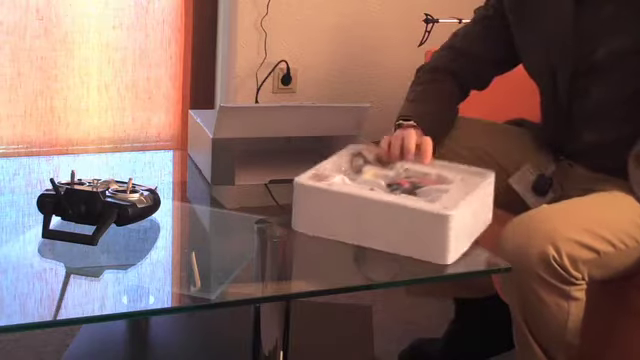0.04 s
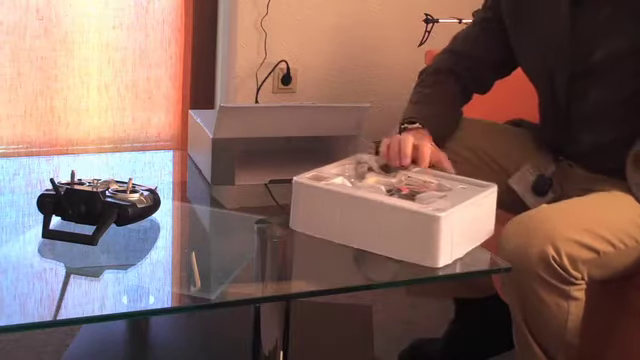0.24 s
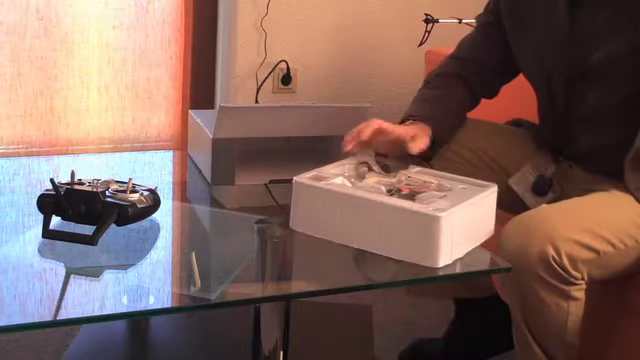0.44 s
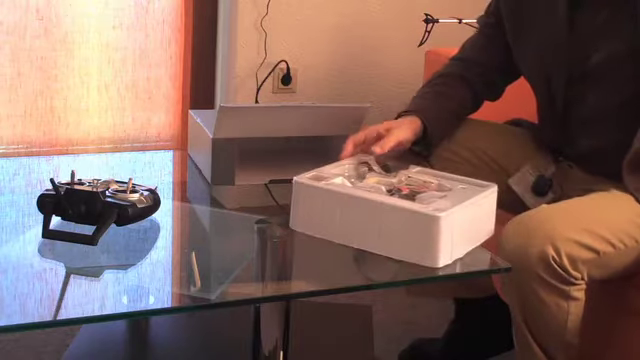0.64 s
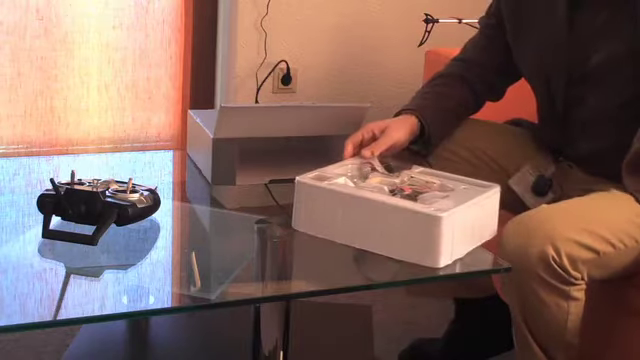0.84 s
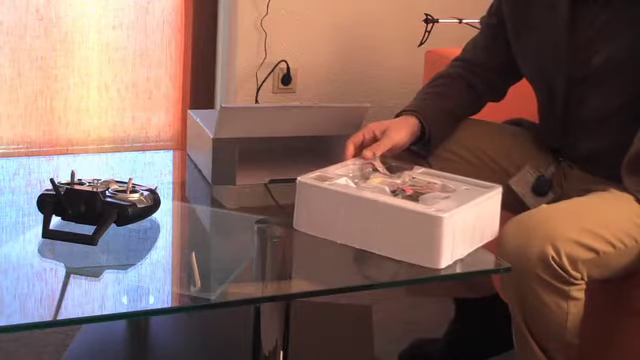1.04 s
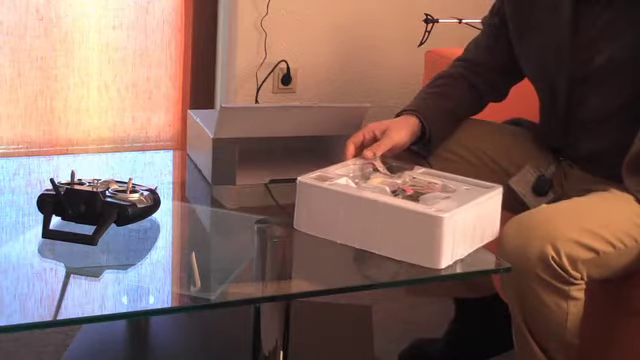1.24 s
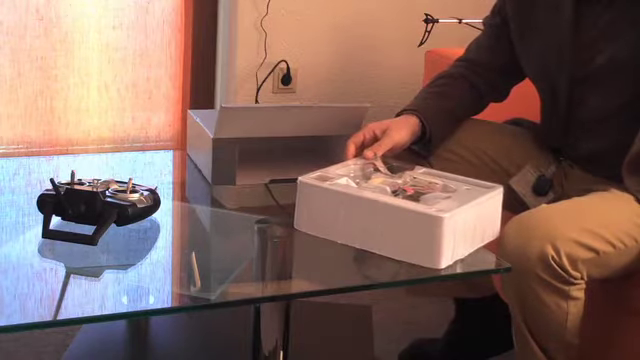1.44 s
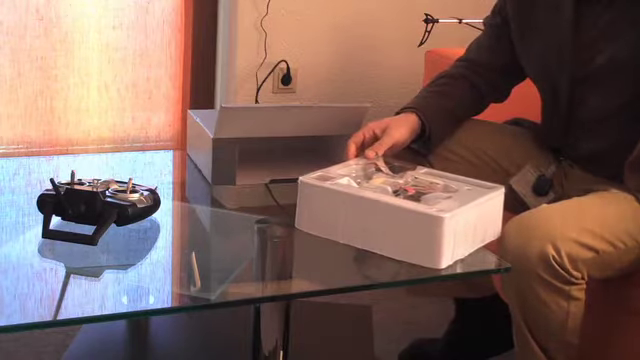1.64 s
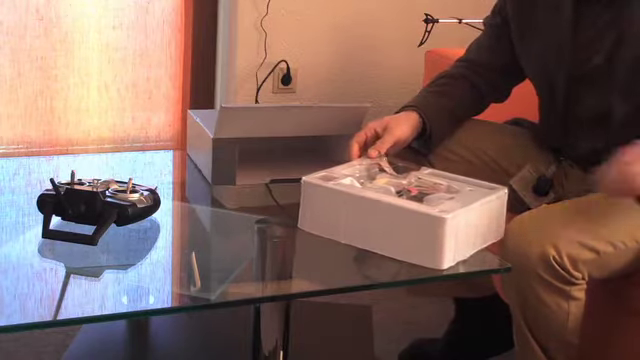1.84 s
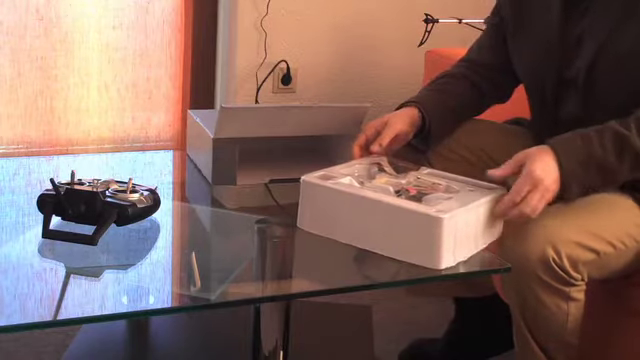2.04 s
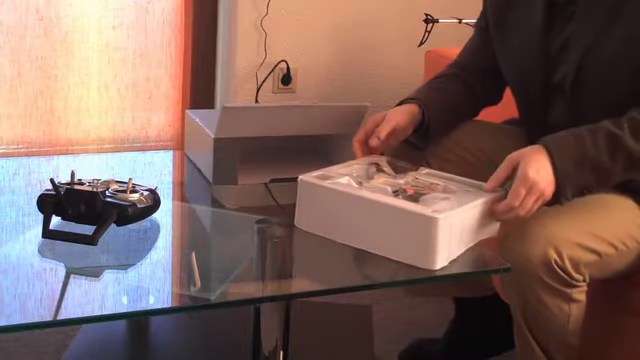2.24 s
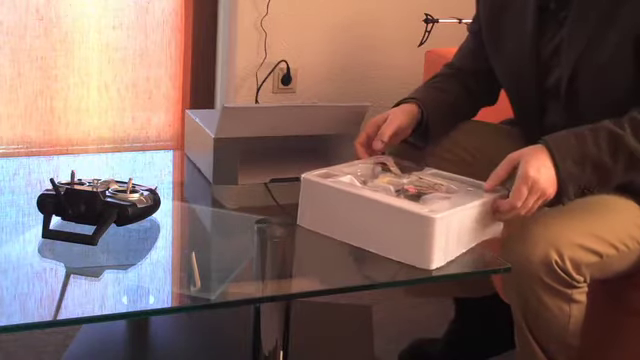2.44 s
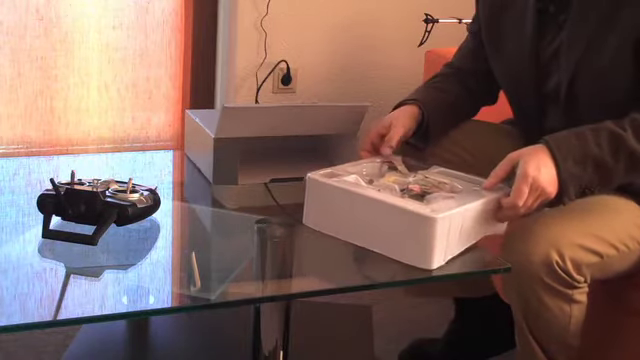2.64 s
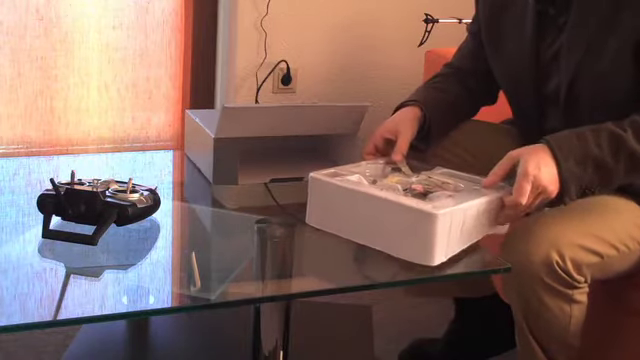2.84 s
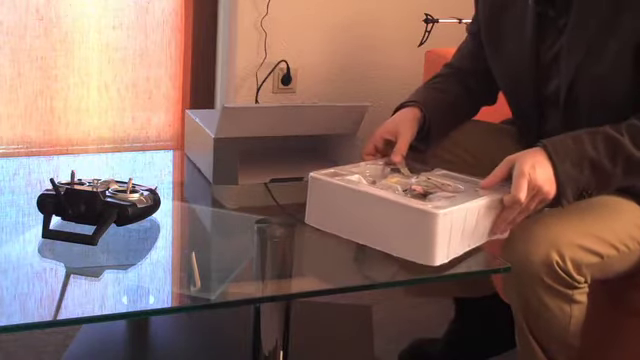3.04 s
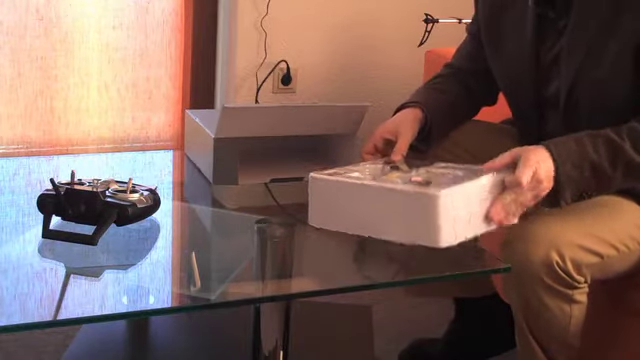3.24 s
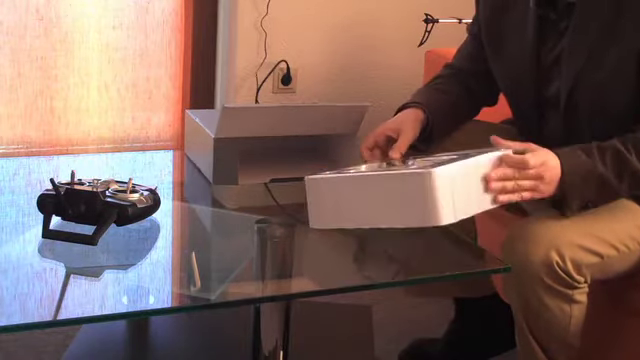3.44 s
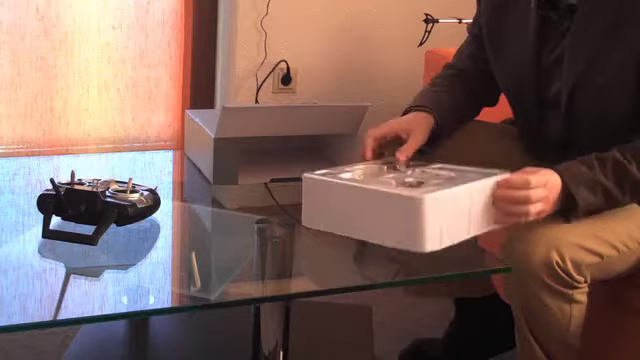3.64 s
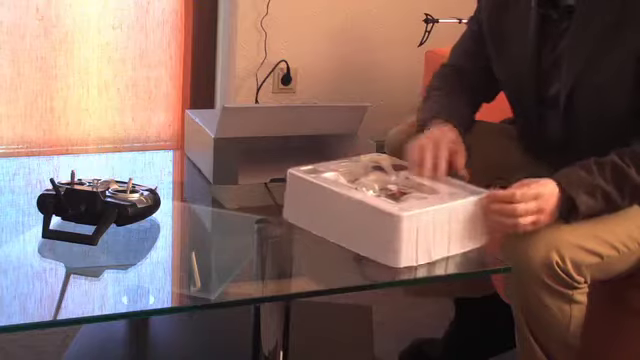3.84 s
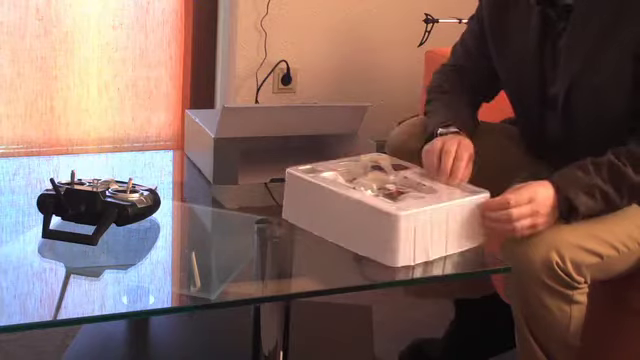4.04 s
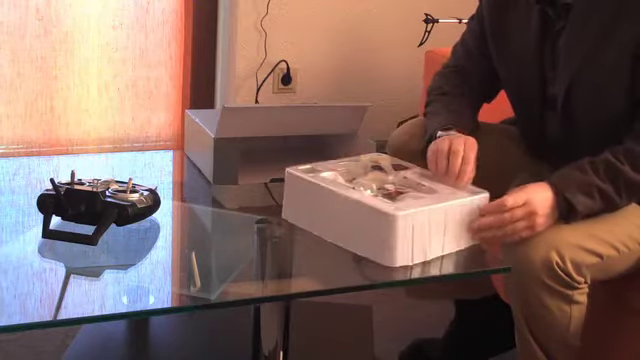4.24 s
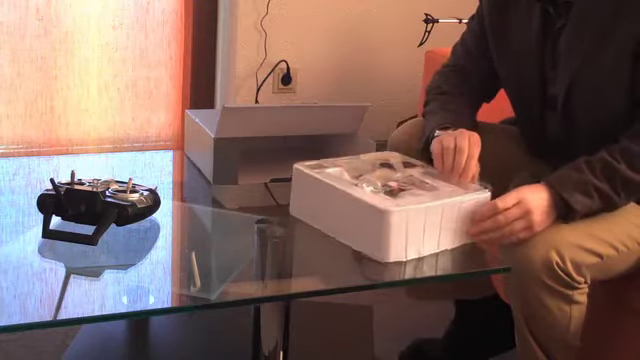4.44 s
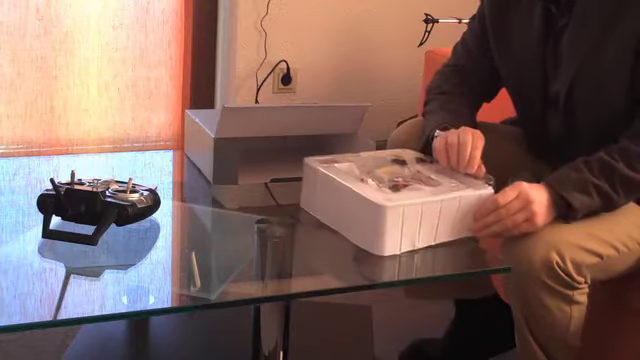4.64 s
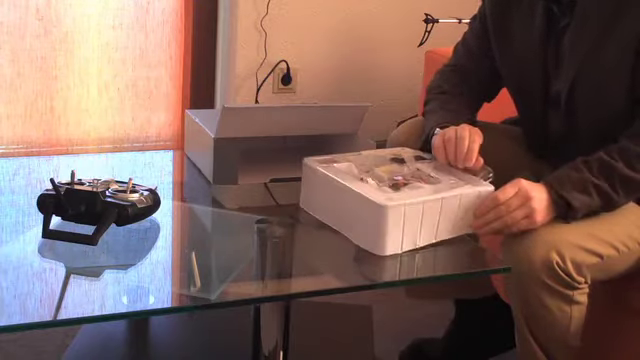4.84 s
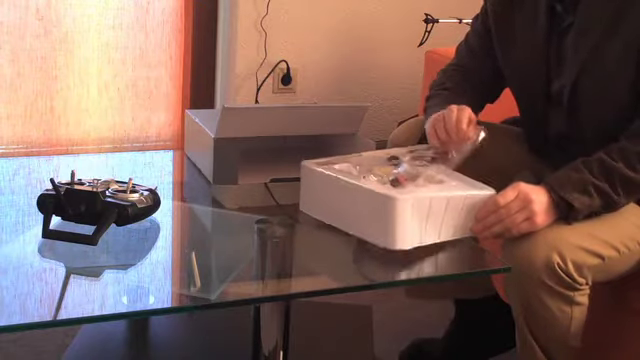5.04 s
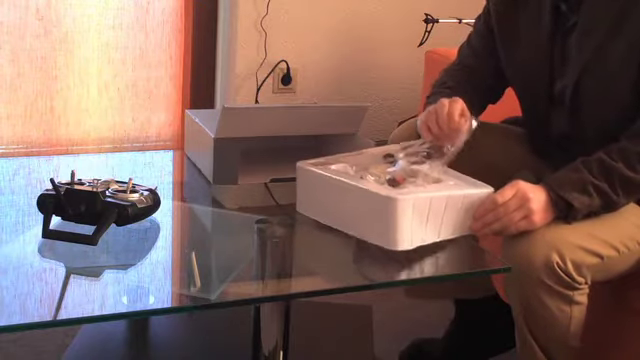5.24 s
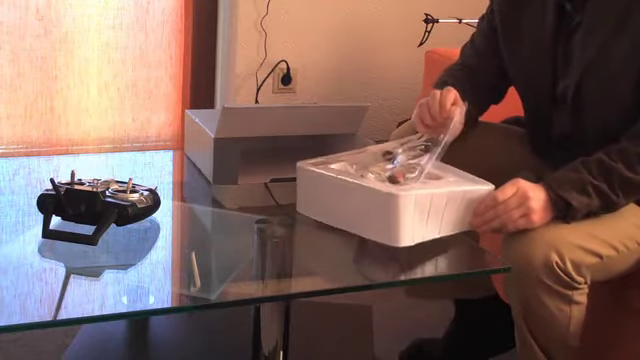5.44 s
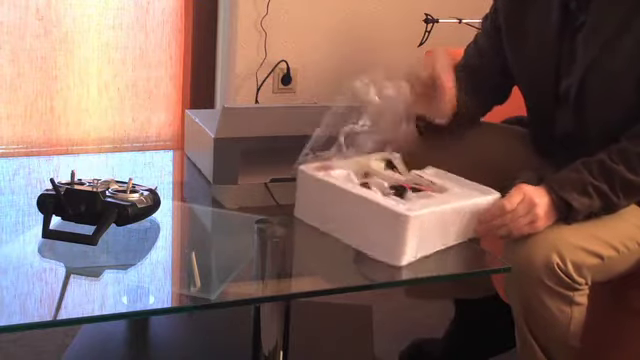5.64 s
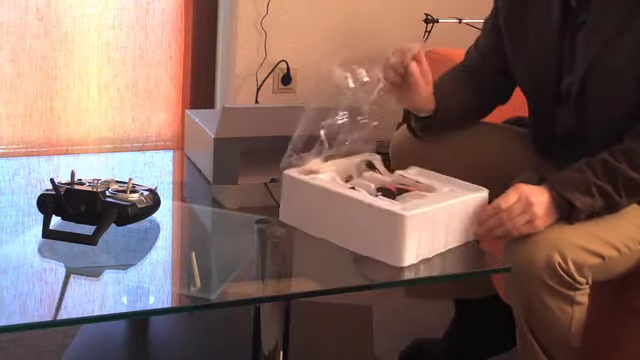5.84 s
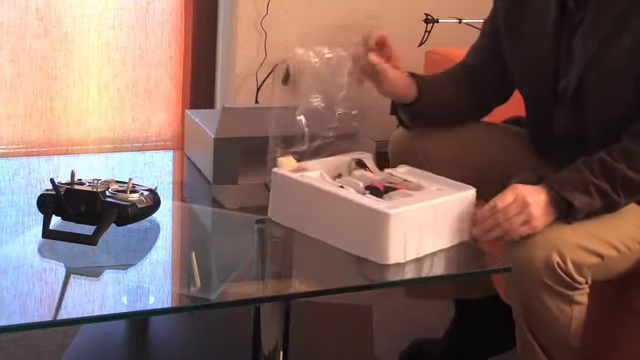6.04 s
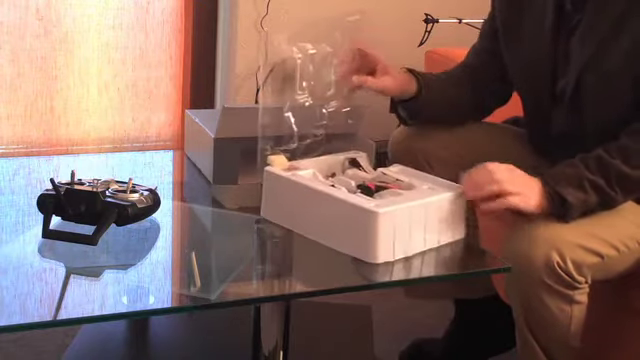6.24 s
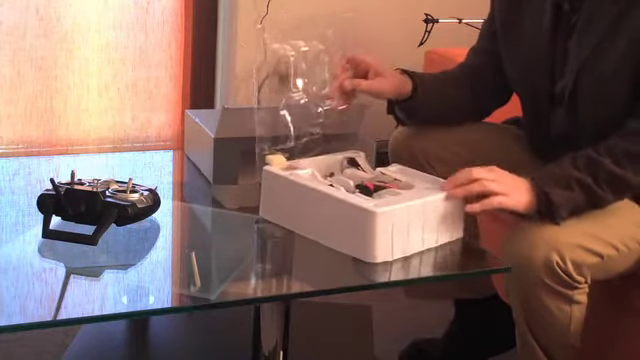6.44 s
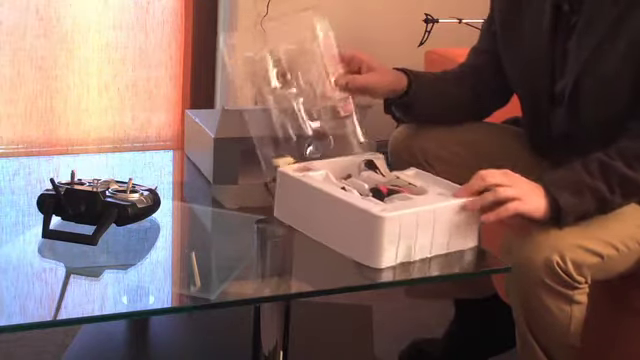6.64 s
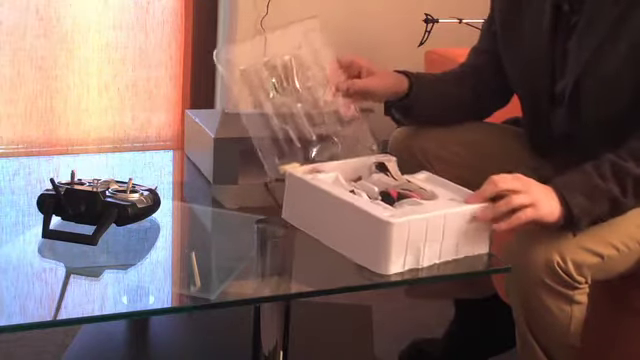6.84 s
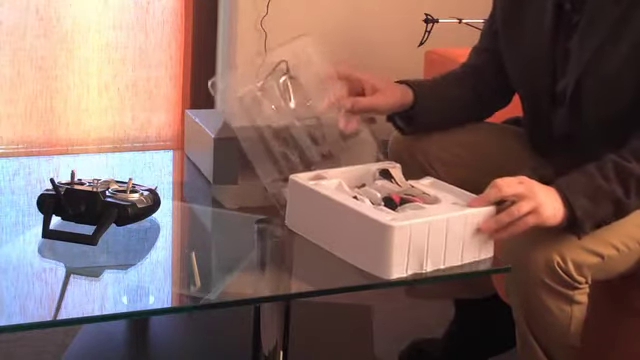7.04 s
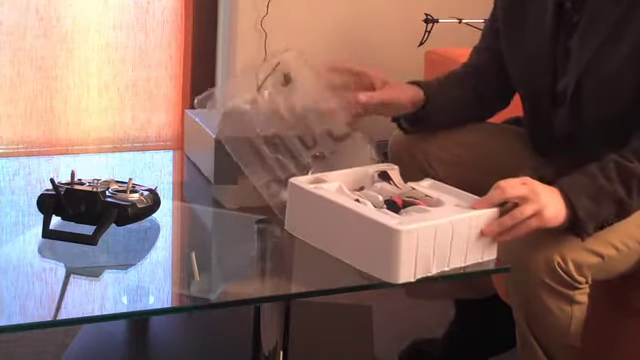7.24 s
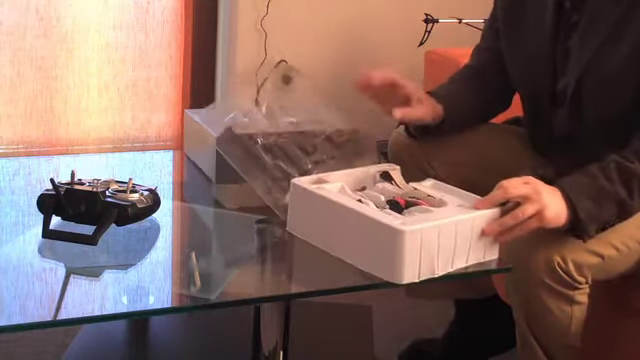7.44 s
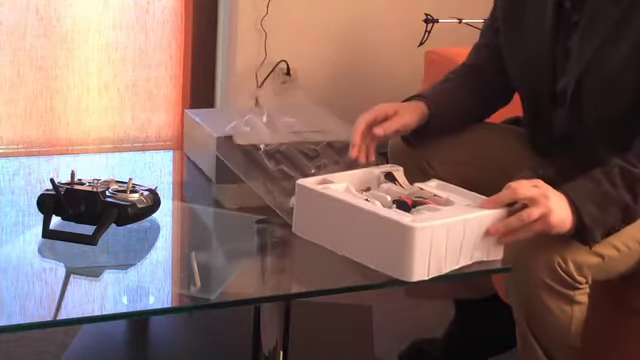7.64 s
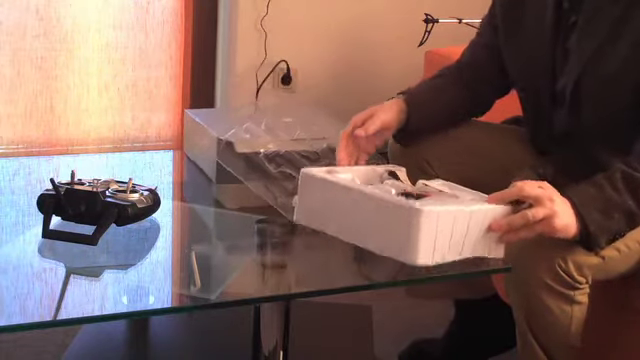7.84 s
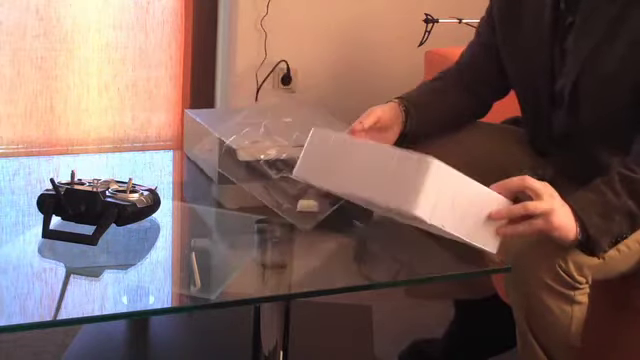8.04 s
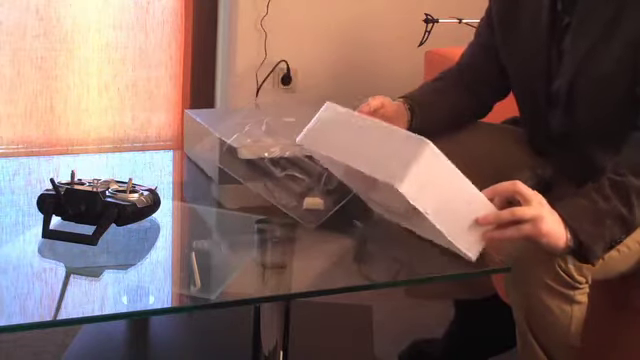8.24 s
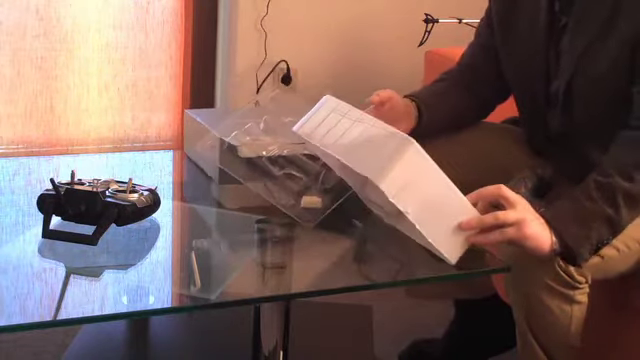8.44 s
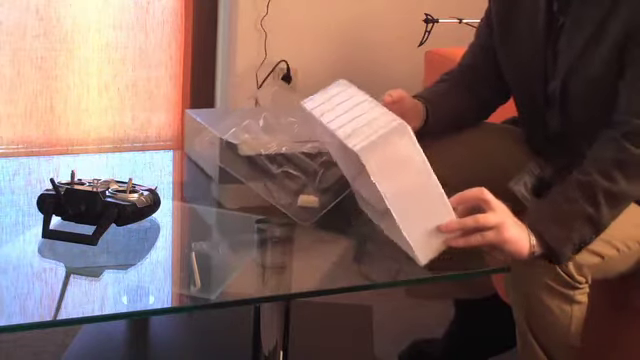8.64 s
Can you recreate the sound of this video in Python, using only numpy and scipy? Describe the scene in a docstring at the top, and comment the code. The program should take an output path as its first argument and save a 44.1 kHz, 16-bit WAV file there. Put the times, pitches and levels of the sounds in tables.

```python
"""A foam tray with a stiff plastic lid is set on a glass table, turned and unpacked in a small furnished room.
Knocks and lid pops are evened noise bursts, sent through broad colour ranges and the tray resonances.
Handling rustles as dense random creases over sliding hiss; single creases snap as short sines with clicks.
A short decaying noise tail answers each; behind lie faint background noise of room and recorder,
as coloured noise with hums, and the recorder's slipping baseline."""
import sys
import numpy as np
from scipy import signal
from scipy.fft import rfft, irfft
from scipy.io import wavfile
from scipy.ndimage import uniform_filter1d

SR = 44100
rng = np.random.default_rng(int(sys.argv[2]) if len(sys.argv) > 2 else 0)


def inscribe(sig):
    """Save sig as 16-bit PCM at rate SR to the path in sys.argv[1].

    A 1-D sig is mono; a 2-D sig holds one channel per row.
    Samples are clipped to [-1, 1] before scaling.
    """
    pcm = np.round(np.clip(np.atleast_2d(sig).T, -1, 1) * 32767)
    wavfile.write(sys.argv[1], SR, pcm.astype(np.int16))


N = 383669

# Tray knocks and lid pops, levels before common gains:
# (time [s], mid level [dB], body re mid [dB], treble re mid [dB], rattle T60 [s])
KNOCKS = [(0.077, -16.5, -4.5, -8.5, 0.031), (1.994, -48, 6.5, -7, 0.043), (2.062, -46.5, 1.5, 2, 0.048),
          (2.414, -43.5, -1, -8, 0.028), (2.872, -52.5, -18, -7, 0.055), (3.378, -39.5, -10, -10, 0.045),
          (3.664, -49.5, -5, -3.5, 0.061), (3.764, -27, 0.5, -14.5, 0.015), (3.776, -37, 4, -18, 0.045),
          (4.18, -46.5, -17, -6, .04), (4.912, -9, -18.5, -5, 0.044), (5.428, -43.5, 0.5, -12, 0.06),
          (5.544, -19, -4.5, 4.5, 0.057), (5.564, -10, -11.5, -8.5, 0.065),
          (5.579, -20.5, 11.5, -23, 0.027), (5.615, -21.5, -32, -3.5, 0.074), (5.943, -43, -22, -3, 0.032),
          (6.398, -45, -11, -2, 0.022), (6.545, -35, -26, -3, 0.035), (6.898, -30, -4, -5, 0.053),
          (6.941, -23.5, -13, 1, 0.023), (6.961, -27.5, -21.5, -19, 0.047), (7.167, -38.5, -24, -8, 0.046),
          (7.258, -35.5, -11.5, 4.5, 0.034), (7.341, -33.5, -28, 4, 0.032), (7.366, -26, -33, -11, 0.047),
          (7.461, -38, -24, 3, 0.03), (7.892, -36.5, -18, 5, 0.059), (7.984, -33, -28, 2.5, 0.028),
          (8.115, -39.5, -26, 1, 0.036), (8.224, -39, -24, -3, 0.059)]
# Rubs and squeezes, levels before common gains; swell and fade span 20 dB:
# (peak time [s], mid level [dB], swell [s], fade [s], body re mid [dB], treble re mid [dB])
RUBS = [(0.0, -54.5, .01, 0.1, 0, 13), (0.081, -33, 0.0099, 0.097, 4, -2),
        (0.215, -48.5, 0.089, .15, -23, 3), (0.3, -55.5, 0.056, 0.13, -16, 13),
        (0.48, -58, 0.2, 0.3, -18, 11), (0.59, -60, 0.14, .17, -16, 6.5), (0.72, -64, .15, 0.18, -16, 12.5),
        (0.83, -61.5, 0.18, 0.16, -16, 12.5), (0.906, -57, 0.033, 0.079, 1, -3),
        (1.006, -51.5, 0.08, 0.11, -18, 8), (1.15, -58, 0.14, .16, -19, 9), (1.33, -66, .1, 0.11, -16, 3),
        (1.72, -61, 0.31, 0.24, 3, -4), (2.1, -55.5, 0.52, .5, -4, -6), (2.43, -54, 0.13, 0.063, 2, -4),
        (2.5, -61.5, .1, 1, -1, -7), (2.88, -65, 0.038, 0.13, 9.5, -10), (3.1, -68.5, 0.069, 0.11, -6, 6),
        (3.24, -61, 0.33, .2, 4, -2), (3.379, -49.5, 0.035, .1, 3.5, -5.5), (3.5, -61, .2, 1.1, -10, -3.5),
        (3.769, -44, 0.09, 0.19, 0.5, -3.5), (4.198, -43, .022, .14, -4.5, -4),
        (4.36, -63, 0.51, 0.67, 4, 1), (4.49, -46.5, 0.08, 0.079, -4, 0), (4.75, -61.5, 0.93, .3, -3, -20),
        (5.1, -47.5, 0.054, 0.22, -5.5, -12), (5.46, -63, 0.26, .3, 5.5, -17),
        (5.7, -40, 0.15, 0.38, -3, -6.5), (5.95, -54, .015, .2, -11, -2), (6.12, -61.5, 0.12, .15, 10, -12),
        (6.408, -49.5, 0.038, 0.1, 2, -8), (6.492, -43.5, 0.031, 0.048, -2.5, 0),
        (6.552, -46.5, 0.033, 0.19, -15, -5.5), (6.882, -55.5, 0.13, 0.059, 3, -4),
        (7.0, -48.5, .03, 0.28, -5, -7), (7.174, -37.5, .018, 0.31, -7.5, -7.5),
        (7.386, -38.5, 0.041, 0.085, 4.5, -6.5), (7.6, -53.5, 0.096, 0.47, -6, 3),
        (7.775, -41.5, .33, .05, -11, -3), (7.845, -42, 0.061, 0.17, -19, 7),
        (7.915, -32, 0.13, 0.14, -19, -5.5), (8.01, -38, .08, 0.2, -20, -4),
        (8.125, -42, .02, 0.39, -16, -9.5), (8.25, -43, 0.087, 0.14, -4, -7),
        (8.46, -39, 0.044, 0.18, -15, -8.5), (8.55, -42.5, 0.17, 0.1, -3, -19)]
# Single plastic creases, peaks before common gain and colouring: (time [s], peak level [dB], pitch [Hz])
TICKS = [(0.1561, -32.5, 5150), (0.2123, -33.5, 5430), (0.278, -35.5, 3130), (0.2868, -26, 4100),
         (0.3998, -40, 4540), (0.427, -33, 5000), (0.4361, -31, 5500), (0.4717, -30.5, 4500),
         (0.5509, -30.5, 4000), (0.6019, -36.5, 4400), (0.7639, -29.5, 3930), (0.8162, -31, 4400),
         (0.8342, -37, 6300), (0.9329, -38, 3910), (0.9528, -33, 5060), (0.9638, -42, 3380),
         (0.9714, -31.5, 4830), (1.0026, -30.5, 3600), (1.089, -32.5, 4540), (1.1292, -46, 4870),
         (1.1359, -28, 4600), (1.1446, -33, 4660), (1.1599, -29.2, 5700), (1.3244, -52, 3100),
         (1.3331, -46, 5850), (2.5494, -42, 3830), (3.9304, -42.5, 5420), (4.1801, -46, 3500),
         (4.7038, -44, 4430), (4.8871, -52.3, 5520), (5.251, -48, 2550), (5.7865, -35.5, 3430),
         (6.1162, -53, 3040), (6.4876, -22, 4500), (6.4964, -32, 4500), (6.5961, -40, 5500),
         (7.2285, -29.5, 3830), (8.0221, -29, 5670), (8.1164, -31, 5600), (8.2385, -34, 4860),
         (8.4613, -39, 2570), (8.4953, -42, 4560)]
# Tray resonances: (centre [Hz], width [Hz], level [dB])
TRAY_MODES = [(434, 26, -2.5), (686, 48, -9.5), (930, 18, -20.5), (1060, 35, -17), (1402, 27, -4),
              (1996, 33, -11)]
# Foam boom, relative spectrum: (frequency [Hz], gain [dB])
BODY = [(150, -24), (300, -7.5), (430, -2), (560, -1.5), (750, -3), (1400, -58.5)]
# Wall clack, relative spectrum: (frequency [Hz], gain [dB])
MID = [(400, -10), (700, -1), (1000, -0.5), (1500, 0), (2200, -1.5), (3200, -8.5), (6000, -47)]
# Plastic crackle, relative spectrum: (frequency [Hz], gain [dB])
TREBLE = [(1500, -7), (2600, 6), (3800, 4.5), (5200, 0.5), (7000, -18.5), (9000, -52)]
# Plastic fizz, relative spectrum: (frequency [Hz], gain [dB])
AIR = [(3500, -14.5), (5200, -1.5), (6300, -4), (7500, -12), (8400, -25), (9000, -70), (9500, -47.5)]
# Crease snaps, relative spectrum: (frequency [Hz], gain [dB])
TICK_COLOUR = [(700, -21.0), (2000, 7), (5000, 2.5), (7500, 2.5), (8600, -13), (9300, -56.0)]
# Room decay by octave: (centre [Hz], T60 [s])
ROOM_T60 = [(250, 0.45), (500, 0.37), (1000, 0.38), (2000, 0.31), (4000, 0.29), (8000, 0.23)]
# Capsule bass loss, relative response: (frequency [Hz], gain [dB])
MIC = [(30, -49.5), (120, -14.5), (250, -11.5), (320, -5), (400, 1.5)]
# Background noise of room and recorder, relative spectrum: (frequency [Hz], density [dB per Hz])
HUSH = [(15, -50), (25, -8.5), (170, -1), (300, -5), (383, -14), (906, -0.5), (1000, -2), (1190, -5),
        (1720, -2.5), (1850, -8), (3100, -11.5), (3680, -11.5), (7150, -21.5), (8920, -63), (11600, -91),
        (19600, -120)]
# Hums in the background noise: (centre [Hz], width [Hz], level re background noise [dB])
HUM_MODES = [(423, 34, -10.5), (1234, 23, -7), (1542, 23, -8.5), (1843, 39, -10)]
# Recorder baseline slips, before the top cut:
# (start [s], offset [full scale], slip time [s], creep-back time constant [s])
SLIPS = [(0, -.0008, .001, 0.074), (.284, .0017, 0.0044, 0.099), (.77, -.0016, .015, 0.081),
         (4.909, -0.006, .003, .003), (4.913, 0.0032, 0.0069, 0.091), (5.27, -.003, 0.075, 0.11),
         (5.545, 0.11, 0.0011, .0012), (5.545, -0.047, 0.0026, .004), (5.548, 0.019, .014, 0.09),
         (5.96, -0.0055, .5, 0.018), (6.83, -.0014, .03, 0.069)]

# air re mid = offset + slope * (treble re mid)
KNOCK_AIR_DB, KNOCK_AIR_SLOPE = -8.5, 1.41
RUB_AIR_DB, RUB_AIR_SLOPE = -5.5, 1.24
RUB_DULLING = 0.21  # share by which treble and air fade faster
CRACKLE_PER_S, CRACKLE_SHARE = 90, 0.58  # rarer creases, bright ranges only
HUSH_DB = -64.5
BASELINE_REST = -0.00043  # full scale
TOP_HZ = 8950


def knocks():
    """Blow: sharp crack, then contact rattle dying away; a new blow overwrites a rattle still sounding."""
    dull, bright = np.zeros(N), np.zeros(N)
    levels_db = np.full((4, N), -120.)
    t_s = np.arange(int(.15 * SR)) / SR
    for start_s, mid_db, body_db, treble_db, t60_s in KNOCKS:
        i = int(start_s * SR)
        burst = slice(i, i + len(t_s))
        contacts = np.minimum(t_s / 0.0022, 1) * rng.standard_normal(len(t_s))
        rattle = np.exp(-np.log(1000) * t_s / np.clip(t60_s, .004, .3))
        crack = 2.48 * np.exp(-t_s / 0.0013)
        dull[burst] = even(contacts * rattle, span_hz=115)
        bright[burst] = even(contacts * (rattle + crack), span_hz=252)
        air_db = KNOCK_AIR_DB + KNOCK_AIR_SLOPE * treble_db
        levels_db[:, i:] = mid_db + np.array([[body_db], [0], [treble_db], [air_db]])
    return undb(-1.5) * voiced([dull, dull, bright, bright], levels_db)


def even(burst, span_hz):
    """Even out a burst's power over frequency, as from many unrelated contacts."""
    spectrum = rfft(burst, 2 * len(burst))
    power = np.abs(spectrum) ** 2
    span_bins = max(int(2 * span_hz * len(burst) / SR), 1)
    local = uniform_filter1d(power, span_bins)
    return irfft(spectrum * np.sqrt(power.mean() / local))[:len(burst)]


def voiced(pushes, levels_db):
    """Forces radiate as foam boom, wall clack, plastic crackle and fizz; body and mid ring the tray."""
    ranges = zip(pushes, levels_db, (BODY, MID, TREBLE, AIR))
    body, mid, treble, air = (colour(push * undb(db), table) for push, db, table in ranges)
    tray = ring(body * undb(-32.0) + mid * undb(-28.5), TRAY_MODES)
    return body + mid + treble + air + tray


def rustle():
    """Creases come in uneven flurries; each range mixes shared and own creases and flickers on its own."""
    levels_db = rubbing()
    shared = creases(1100, 4.24)
    flurry = undb(1.3 * walk(70))
    pushes = []
    for _ in levels_db:
        own = .9 * creases(700, 3.0)
        flicker = undb(1.2 * walk(80))
        pushes.append((shared + own) * flurry * flicker)
    crackle = CRACKLE_SHARE * creases(CRACKLE_PER_S, 4.5)
    pushes[2:] = [push + crackle for push in pushes[2:]]
    return undb(-9.0) * hollow(voiced(pushes, levels_db), patchy_db=1.84, wide_hz=450, long_s=0.043)


def rubbing():
    """Body, mid, treble and air levels [dB]: rubs swell and fade, overlaps add in power."""
    power = np.full((4, N), 1e-14)
    t_s = np.arange(N) / SR
    for peak_s, mid_db, swell_s, fade_s, body_db, treble_db in RUBS:
        rise = (peak_s - t_s) / max(swell_s, .002)
        fall = (t_s - peak_s) / max(fade_s, .002)
        shape = undb(-20 * np.where(t_s < peak_s, rise, fall))
        air_db = RUB_AIR_DB + RUB_AIR_SLOPE * treble_db
        tint_db = np.array([[body_db], [0], [treble_db], [air_db]])
        dulling = np.where(t_s > peak_s, shape, 1) ** np.array([[0], [0], [RUB_DULLING], [RUB_DULLING]])
        power += (shape * dulling * undb(mid_db + tint_db)) ** 2
    return 10 * np.log10(power)


def creases(rate_per_s, spread_db):
    """Tiny snaps at random moments, of unequal but bounded size, over sliding hiss."""
    chance = rng.random((3, N))
    size = undb(spread_db * np.minimum(-np.log(chance[2] + 1e-9), 3.5))
    snaps = (chance[0] < rate_per_s / SR) * np.sign(chance[1] - .5) * size
    return snaps / np.std(snaps) + 0.73 * rng.standard_normal(N)


def hollow(x, patchy_db, wide_hz, long_s):
    """The rubbed spot moves over walls and pockets: colour shifts in patches of pitch and time."""
    _, _, spectra = signal.stft(x, nperseg=512)
    field = rng.standard_normal(spectra.shape)
    wide_bins = max(int(wide_hz * 512 / SR), 1)
    long_frames = max(int(long_s * SR / 256), 1)
    for _ in range(2):
        field = uniform_filter1d(field, wide_bins, axis=0)
        field = uniform_filter1d(field, long_frames, axis=1)
    gain = undb(patchy_db * field / field.std())
    return signal.istft(spectra * gain, nperseg=512)[1][:N]


def ticks():
    """A crease snaps: a brief sine at its own pitch plus a wide click."""
    out = np.zeros(N)
    t_s = np.arange(int(.006 * SR)) / SR
    for start_s, peak_db, hz in TICKS:
        cycles = t_s * hz
        tone = np.sin(2 * np.pi * cycles) * (cycles / 0.66) * np.exp(1 - cycles / 0.57)
        click = 0.33 * rng.standard_normal(len(t_s)) * np.exp(-t_s / 0.0017)
        snap = tone + click
        snap *= undb(peak_db - 1.5) / np.abs(snap).max()
        i = int(start_s * SR)
        out[i:i + len(t_s)] += snap
    return colour(out, TICK_COLOUR)


def room(dry, wet_db):
    """Table and walls: dense echoes from a few ms on, each octave fading at its own rate."""
    t_s = np.arange(int(.7 * SR)) / SR
    tail = 0
    for hz, t60_s in ROOM_T60:
        edges_hz = [hz / np.sqrt(2), hz * np.sqrt(2)]
        octave = signal.butter(2, edges_hz, "bandpass", fs=SR, output="sos")
        band = signal.sosfilt(octave, rng.standard_normal(len(t_s)))
        tail = tail + band * np.exp(-np.log(1000) * t_s / t60_s)
    tail *= np.clip((t_s - .0015) / 0.002, 0, 1)
    unit_tail = tail / np.sqrt(np.sum(tail ** 2))
    return signal.fftconvolve(dry, undb(wet_db) * unit_tail)[:N]


def hush():
    """Background noise of room and recorder: coloured noise and resonant hums, both wavering a little."""
    noise = colour(rng.standard_normal(N), HUSH) * undb(0.45 * walk(15.0))
    hums = ring(rng.standard_normal(N), HUM_MODES) * undb(0.5 * walk(3.4))
    return undb(HUSH_DB) * (noise + hums)


def baseline():
    """Recorder baseline: each slip ramps away from rest, then decays back."""
    out = np.full(N, BASELINE_REST)
    t_s = np.arange(N) / SR
    for start_s, offset, slip_s, creep_s in SLIPS:
        ramp = np.clip((t_s - start_s) / slip_s, 0, 1)
        out += offset * ramp * np.exp(-np.maximum(t_s - start_s - slip_s, 0) / creep_s)
    return uniform_filter1d(out, 90)


def undb(db):
    """dB to gain."""
    return 10 ** (np.asarray(db) / 20)


def on_log(hz, table):
    """Read (Hz, value) points on a log-frequency axis."""
    table_hz, values = np.transpose(table)
    return np.interp(np.log(np.maximum(hz, 1)), np.log(table_hz), values)


def colour(x, table):
    """Causal minimum-phase filter of unit power shaped by (Hz, dB) points, from the cepstrum."""
    size = 2048
    hz = np.arange(size // 2 + 1) * SR / size
    cepstrum = irfft(np.log(undb(on_log(hz, table))))
    cepstrum[1:size // 2] *= 2  # fold onto positive time
    cepstrum[size // 2 + 1:] = 0
    taps = irfft(np.exp(rfft(cepstrum)))
    return signal.fftconvolve(x, taps / np.sqrt(np.sum(taps ** 2)))[:len(x)]


def ring(x, modes):
    """Sum of resonances, scaled to unit power on white noise before each level."""
    out = 0
    for hz, width_hz, db in modes:
        b, a = signal.iirpeak(hz, hz / width_hz, SR)
        out = out + undb(db) * np.sqrt(SR / (np.pi * width_hz)) * signal.lfilter(b, a, x)
    return out


def walk(rate_hz):
    """Random levels held 1 / rate_hz and slewed twice; unit spread."""
    hold = int(SR / rate_hz)
    steps = np.repeat(rng.standard_normal(N // hold + 1), hold)
    levels = uniform_filter1d(uniform_filter1d(steps, hold), hold)[:N]
    return levels / np.std(levels)


def scene():
    """Tray and lid with their echoes, through the capsule, over background noise of room and recorder."""
    blows, rub, snaps = knocks(), rustle(), ticks()
    echoes = room(blows + undb(-1.0) * snaps + undb(-9.5) * rub, wet_db=-3)
    handling = undb(-0.52) * colour(blows + snaps + rub + echoes, MIC)
    return (handling + hush())[None, :]


def record(dry):
    """Recorder: rounds loud peaks, adds a wandering baseline, cuts the top steeply."""
    drift = baseline()
    drift += (.00008 + 0.21 * np.abs(drift)) * walk(55)  # wanders more when displaced
    rounded = np.tanh(1.676 * dry) / 1.653
    top_cut = signal.ellip(12, .3, 80, TOP_HZ, fs=SR, output="sos")
    return signal.sosfilt(top_cut, rounded + drift)


dry = scene()
out = record(dry)
inscribe(out)
```